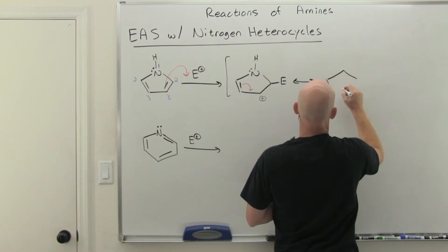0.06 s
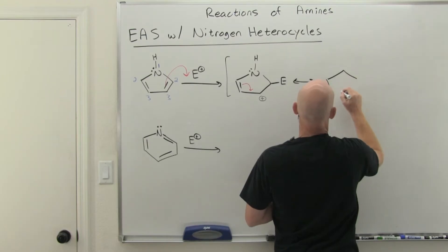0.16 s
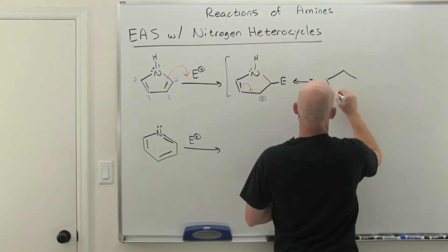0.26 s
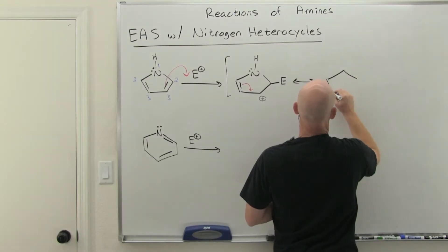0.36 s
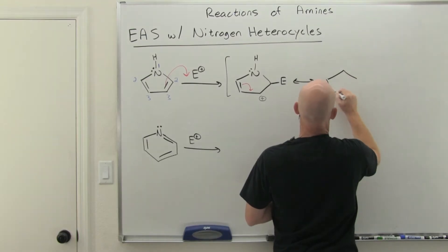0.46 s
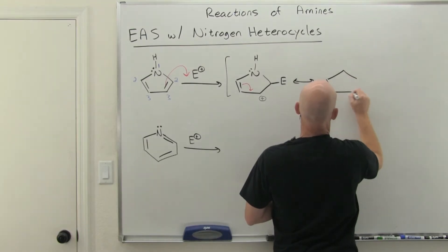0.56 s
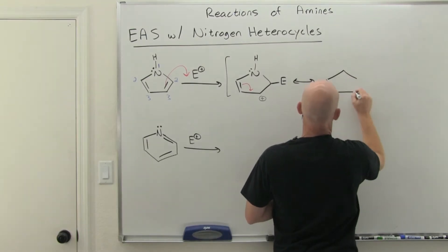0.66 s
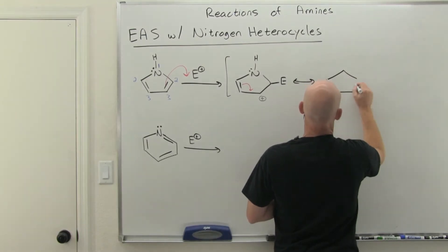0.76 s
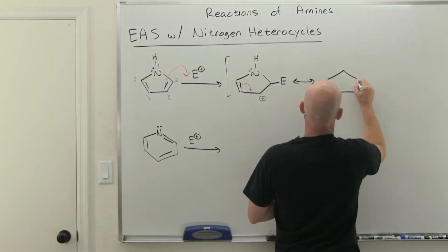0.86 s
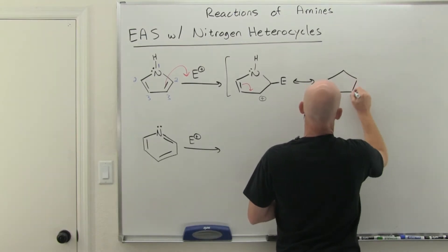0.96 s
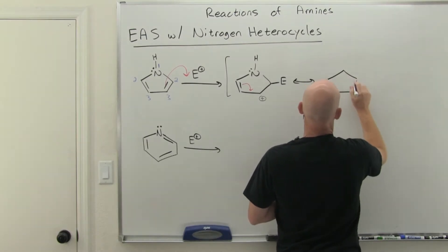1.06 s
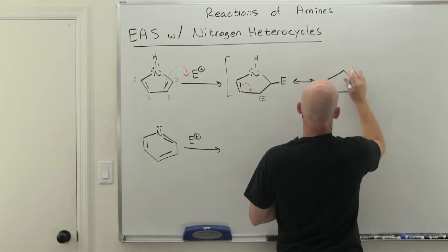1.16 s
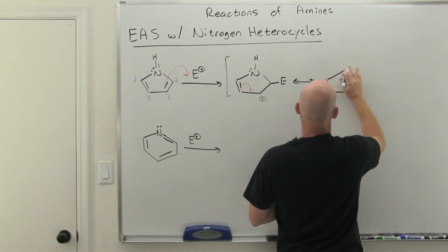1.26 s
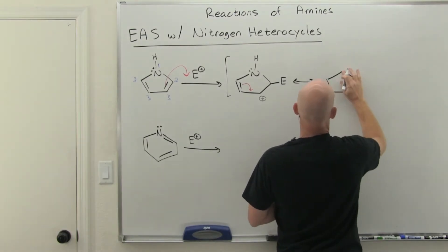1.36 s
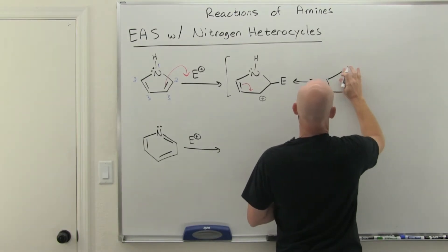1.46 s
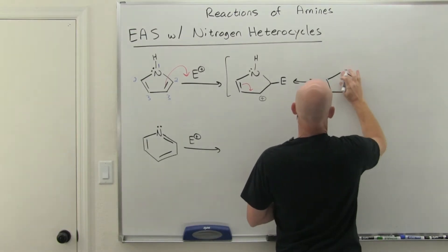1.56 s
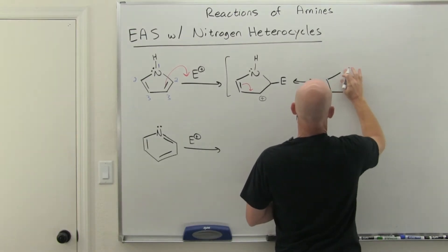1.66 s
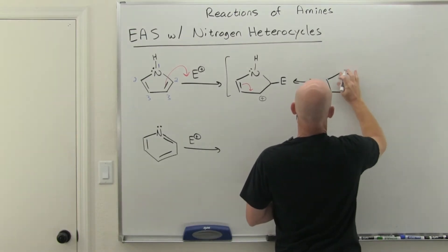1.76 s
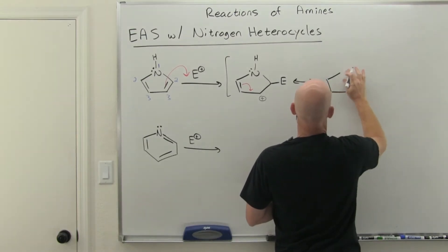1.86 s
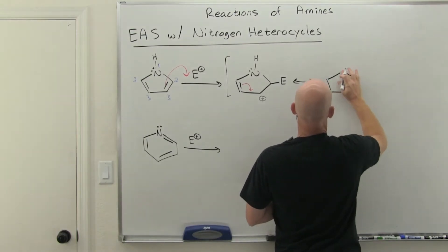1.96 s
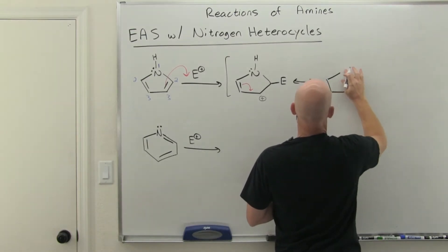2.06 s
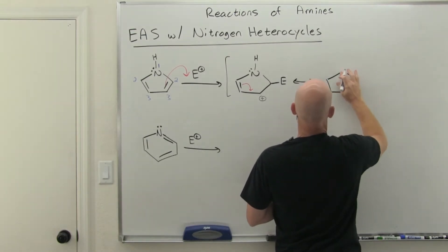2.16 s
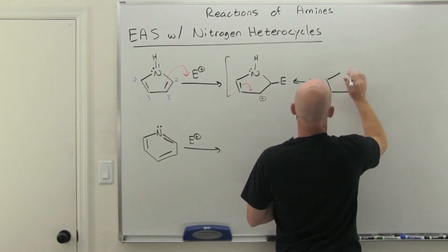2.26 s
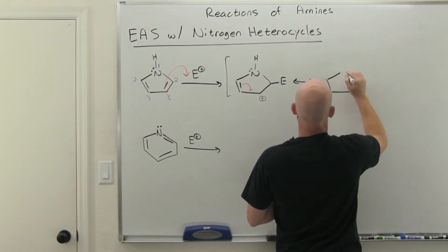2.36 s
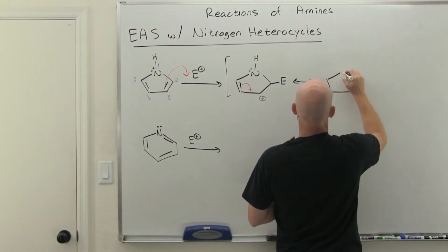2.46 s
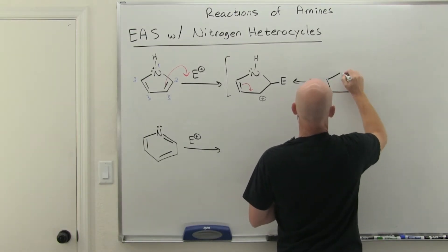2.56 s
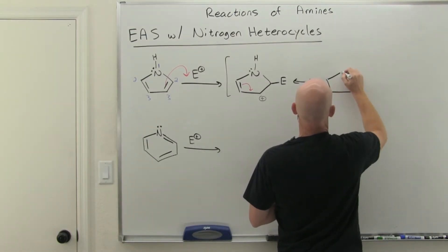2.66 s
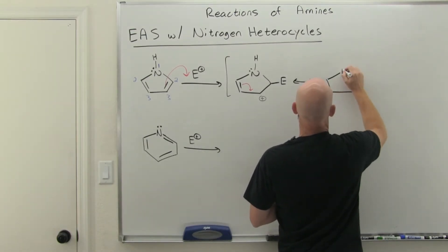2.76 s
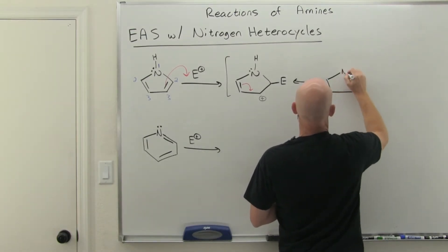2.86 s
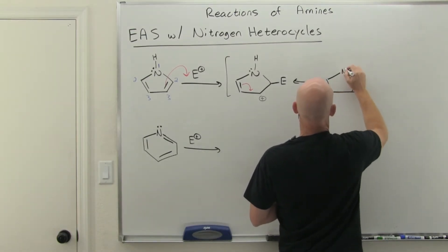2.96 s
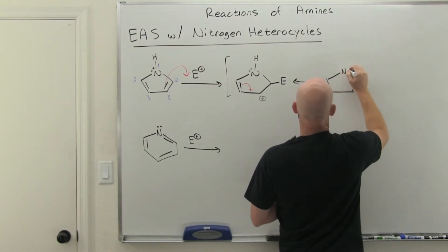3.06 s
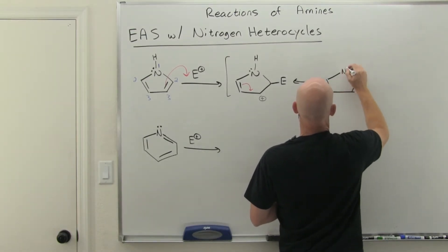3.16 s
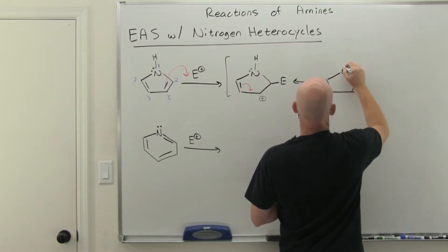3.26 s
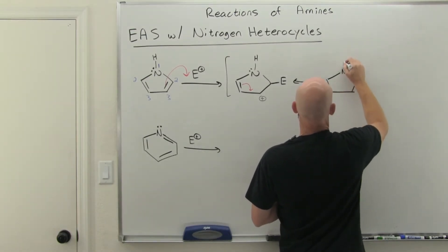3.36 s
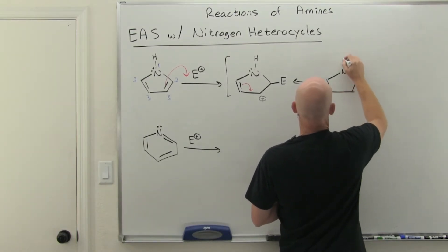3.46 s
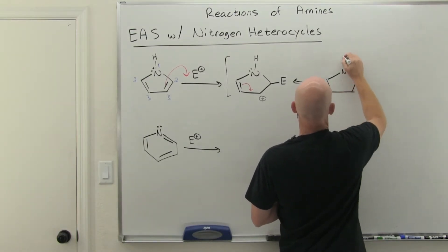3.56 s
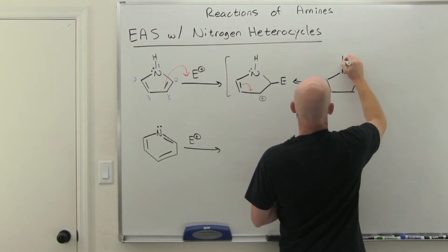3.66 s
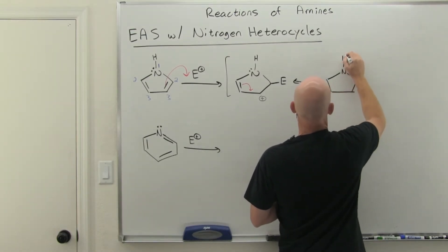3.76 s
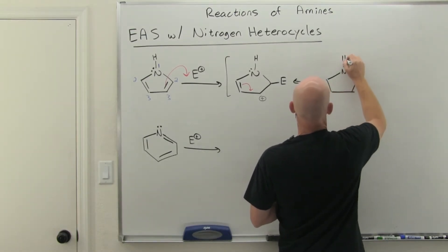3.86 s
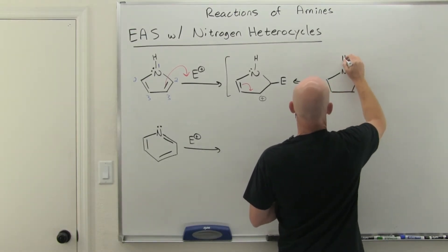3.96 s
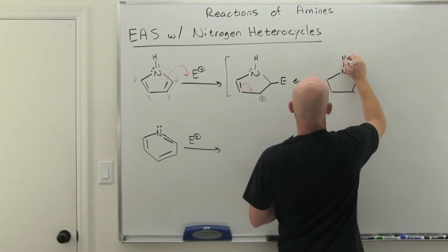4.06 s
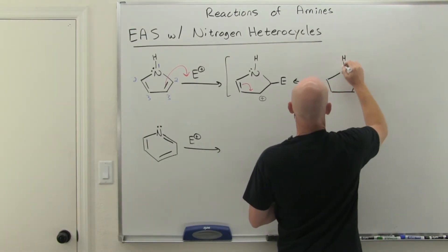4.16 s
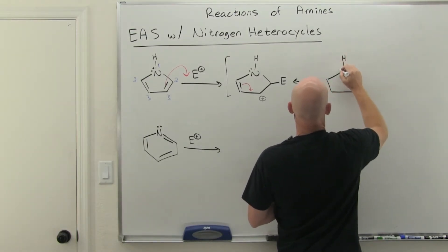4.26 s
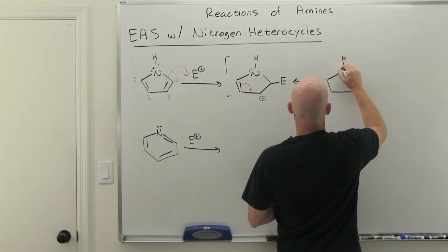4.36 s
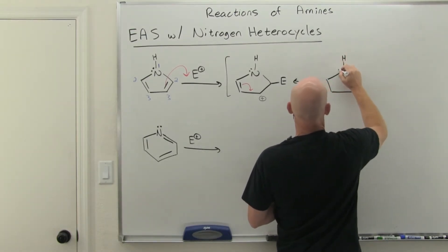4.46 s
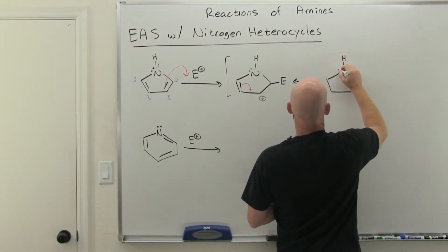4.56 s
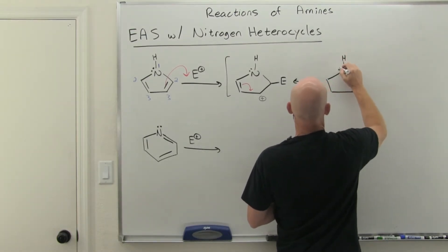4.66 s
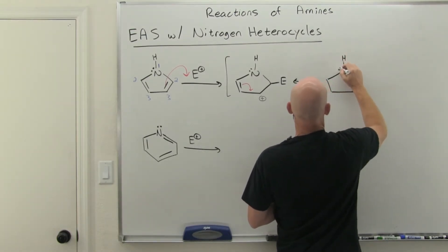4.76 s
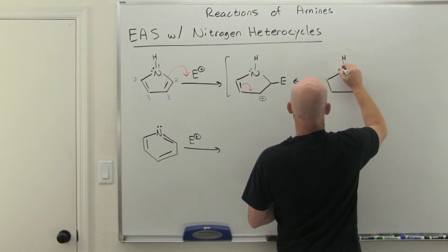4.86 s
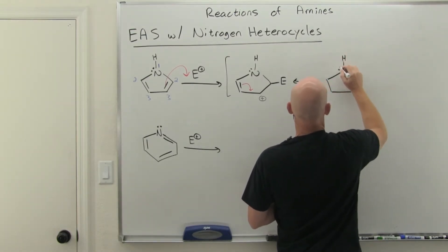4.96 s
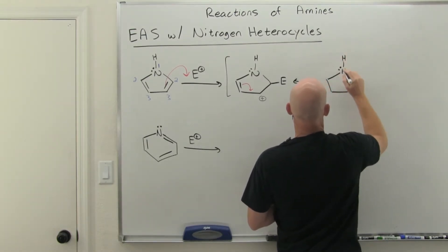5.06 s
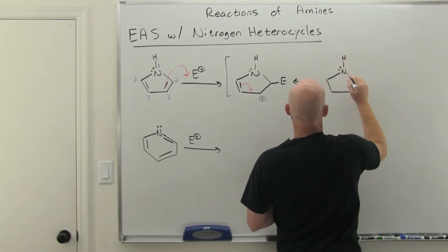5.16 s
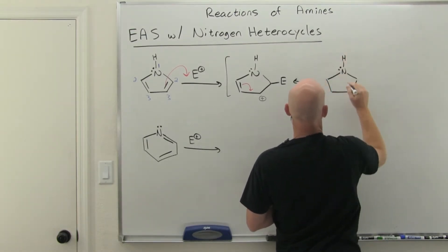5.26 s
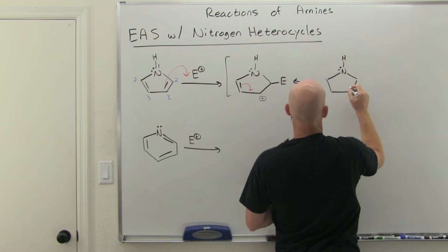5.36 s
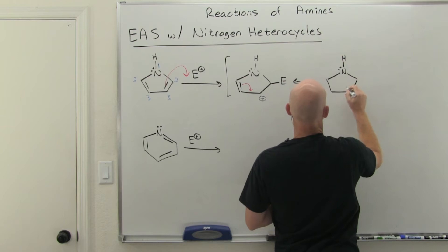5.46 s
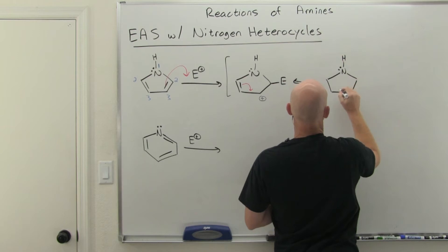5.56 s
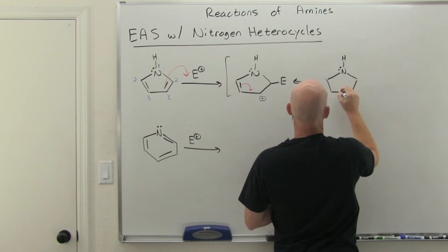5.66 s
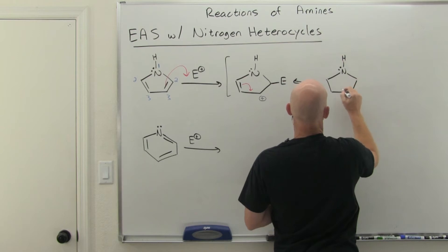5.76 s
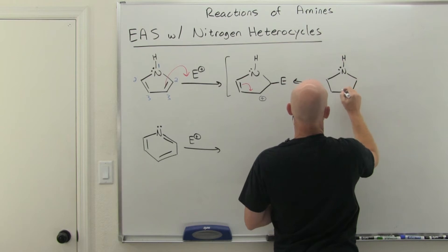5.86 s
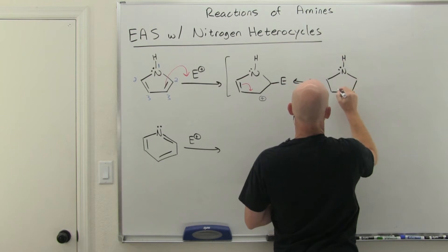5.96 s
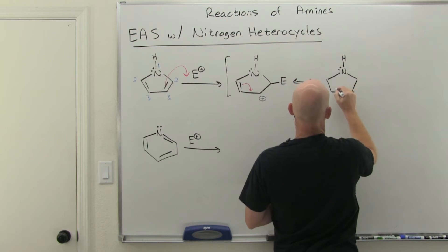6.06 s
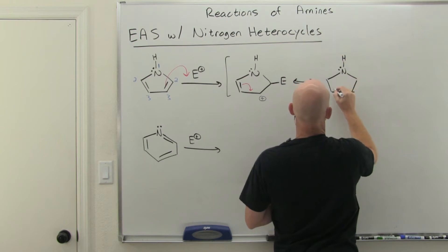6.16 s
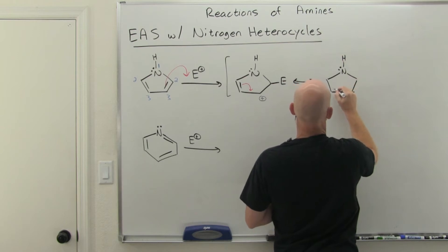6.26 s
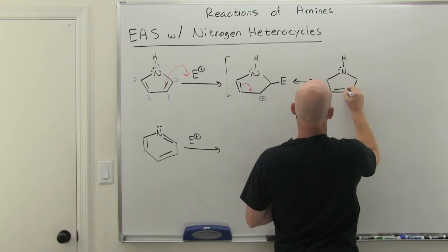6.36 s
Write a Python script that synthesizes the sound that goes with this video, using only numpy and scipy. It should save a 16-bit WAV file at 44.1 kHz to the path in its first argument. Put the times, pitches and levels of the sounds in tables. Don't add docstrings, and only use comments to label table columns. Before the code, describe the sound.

In a small quiet room, a felt marker writes on a wall whiteboard a few steps from the microphone. Soft hollow thumps and dry plastic clicks come sparsely at first, the hardest tap near one second, then cluster in quick succession from the middle onward. Very faint airy squeaks follow some landings. Low ventilation rumble and thin microphone hiss continue throughout.

```python
import sys
import numpy as np
from scipy import signal
from scipy.fft import rfft, irfft, next_fast_len
from scipy.io import wavfile
from scipy.ndimage import uniform_filter1d, map_coordinates

SR = 44100
rng = np.random.default_rng(int(sys.argv[2]) if len(sys.argv) > 2 else 0)


def transcribe(signal):
    frames = np.atleast_2d(signal).T
    limited = np.clip(frames, -1, 1)
    pcm = np.round(limited * 32767).astype(np.int16)
    wavfile.write(sys.argv[1], SR, pcm)


def gain_from_db(level_db):
    decades = np.asarray(level_db, float) / 20
    return 10 ** decades


N = 283122

# start_s, peak_db, low_modes_db, middle_modes_db, contact_ms
TIP_LANDINGS = [
    (0.4468, -23, 3, 8, 0.94),
    (0.9127, -15, -0.5, -8, 0.61),
    (2.604, -20, 3, -1, 0.63),
    (3.321, -18, 1.5, -3, 0.72),
    (3.6144, -23, 2.5, 3, 0.93),
    (3.8591, -20, 0, 4.5, 0.6),
    (4.065, -20, 3.5, 3, 0.81),
    (4.4519, -30.5, 5, -2.5, 1.24),
    (4.76, -28.5, 6, -3, 0.83),
    (6.201, -35.5, 9, 12, 2.2),
]
# pitch_hz, level_db, t60_s
PANEL_MODES = [(44, -11.5, 0.48), (121.5, -10.5, 0.11), (173.4, -18.5, 0.42), (236, 0.5, 0.19),
               (274.8, -10.5, 0.2), (355.2, -5.5, 0.15), (452, -3, 0.098), (520, -6, 0.083),
               (574.4, -10, 0.13), (648, -12, 0.043), (697.7, -3, 0.11), (715, -2.5, 0.13),
               (818, -16, 0.24), (917, -17.5, 0.16)]
# pitch_hz, level_db_per_hz
DENSE_MODES = [(60, -19), (150, -9.5), (300, -5), (700, -8), (900, -15), (1500, -22), (3000, -49),
               (6000, -70)]
# pitch_hz, level_db_per_hz
FELT_SLAP = [(700, -29), (1200, 8.5), (2000, 2), (3000, -7.5), (5000, -19), (9000, -24)]


def taps():
    out, t = np.zeros(N + SR), np.arange(SR // 2) / SR
    for start_s, peak_db, low_db, mid_db, contact_ms in TIP_LANDINGS:
        ring = 0
        for hz, level_db, t60_s in PANEL_MODES:
            place_db = np.interp(hz, [287, 444, 610, 670], [low_db, mid_db, mid_db, 0])
            chance_db, detune = rng.normal(0, [1.5, .006])
            decay = gain_from_db(level_db + place_db + chance_db - 60 * t / t60_s)
            ring = ring + decay * np.cos(2 * np.pi * hz * (1 + detune) * t + 0.2)
        boom_swell = 1 - np.exp(-t / 0.0011)
        ring = ring + gain_from_db(-4.0 - 60 * t / 0.22) * boom_swell * noise(DENSE_MODES, len(t))

        u = (t[:250] - .002) / (contact_ms * 0.00067)
        push = np.exp(-u ** 2 * 2.4)
        body = np.convolve(ring, push / push.sum())[:len(t)]
        jerk = np.exp(-(u + 0.62) ** 2 * 2.6) - gain_from_db(0.5) * np.exp(-(u - .85) ** 2 * 1.2)
        face = np.pad(jerk, (0, len(t) - len(push)))
        slap_rise = np.clip(t / 0.00064 - 1.5, 0, 1)
        slap = gain_from_db(-35.5 - 60 * t / 0.16) * slap_rise * noise(FELT_SLAP, len(t))
        tap = gain_from_db(-9.0) * body + gain_from_db(-4.0 + 0.5 * low_db) * face + slap
        out[round((start_s + .0024) * SR):][:len(t)] += gain_from_db(peak_db) * tap
    return filtered(out[:N], lambda hz: 1j * hz / (1j * hz + 35))


# pitch_hz, width_hz, level_db
BARREL_MODES = [(704, 810, 3.5), (1305, 190, 3), (1480, 120, 8.5), (2237, 43, -3), (4110, 134, 8.5),
                (4120, 117, 4), (5200, 500, -6), (7030, 214, -8.5)]
# delay_ms, level_db
CLICK_BOUNCES = [(0, 7), (.45, 9), (1.3, 5), (1.9, 0.5), (2.6, 3), (3.4, 6), (4.2, -43), (5.0, 5),
                 (6.1, -55), (7.3, 3.5), (9.0, -4), (10.4, -9.5), (12.2, -35)]
# start_s, peak_db
HARD_KNOCKS = [(-0.018, -36.5), (0.9331, -32.5), (1.089, -32), (1.2681, -32), (1.8705, -33.5),
               (2.2788, -32.5), (2.4635, -33.5), (3.443, -34), (3.6318, -31), (3.7722, -34), (3.988, -38),
               (4.0316, -47), (4.1773, -36.5), (4.353, -34.5), (4.9084, -36.5)]
# start_s, peak_db, rattle_db
LIGHT_TICKS = [(0.5254, -49.5, -10), (0.9678, -47, -7), (1.1903, -51, -7.5), (1.365, -50.5, -8),
               (1.9706, -51, -9), (2.383, -56, -11), (2.6734, -49.5, -12), (3.35, -48.5, -8.5),
               (3.6794, -47, -12), (3.8811, -48, -5.5), (4.0873, -49, -4.5), (4.2764, -52.5, -12),
               (4.7932, -47, -11)]
KNOCK_RATTLE_DB, RATTLE_MS = -32.5, 1.6
THIN_HZ_PER_DB = 110


def barrel(hz):
    return sum((-1) ** k * gain_from_db(level_db) * resonance(hz, centre_hz, width_hz)
               for k, (centre_hz, width_hz, level_db) in enumerate(BARREL_MODES))


def crack(hz):
    return resonance(hz, 3890, 3450) ** 2 - gain_from_db(1.0) * resonance(hz, 1750, 3800) ** 2


def clicks():
    out, t = np.zeros(N + SR), np.arange(SR // 4) / SR
    lead_s = 0.1
    scatter = rng.standard_normal(len(t)) * gain_from_db(-20 - 60 * t / 0.13) * (1 - np.exp(-t / 0.00067))
    for start_s, peak_db, rattle_db in [(*row, KNOCK_RATTLE_DB) for row in HARD_KNOCKS] + LIGHT_TICKS:
        chance = rng.standard_normal((3, len(t)))
        knocks = scatter + gain_from_db(-20.5 - 60 * t / 0.24) * chance[0]
        for k, (delay_ms, level_db) in enumerate(CLICK_BOUNCES):
            at_ms = abs(delay_ms + .03 * chance[2, 50 + k])
            knocks[round(at_ms * 1e-3 * SR)] += gain_from_db(level_db + chance[2, k])
        thin_hz = max(50, THIN_HZ_PER_DB * (rattle_db - KNOCK_RATTLE_DB))
        ring = filtered(knocks, lambda hz: (crack(hz) + barrel(hz)) * (1j * hz / (1j * hz + thin_hz)) ** 2)

        rattle = chance[1] * (np.exp(-(t / (RATTLE_MS / 1000)) ** 2) + gain_from_db(-3 - 60 * t / 0.11))
        edge = filtered(rattle, lambda hz: resonance(hz, 5900, 14000) ** 2)
        click = gain_from_db(-11.0) * ring / ring[:400].std() + gain_from_db(rattle_db + 0.5) * edge / edge[:150].std()
        out[round((start_s + lead_s + .0002) * SR):][:len(t)] += gain_from_db(peak_db) * click
    return out[round(lead_s * SR):][:N]


# start_s, length_s, top_db, fastest_place_0_to_1, whistle_hz
PEN_STROKES = [(0.476, 0.22, -61.5, 0.67, 7200), (0.941, 0.11, -63, .15, 5800),
               (2.705, .105, -64, 0.7, 5700), (2.827, 0.12, -67.5, 0.2, 5800),
               (2.901, 0.128, -64, 0.4, 5790), (3.355, 0.08, -65, .3, 5660), (3.64, 0.099, -66, .3, 5750),
               (3.883, 0.08, -64, 0.3, 5680), (4.084, 0.053, -64.5, .15, 5610),
               (4.812, .085, -68, .5, 7060), (6.328, 0.23, -58, 0.75, 6750)]
# pitch_hz, level_db_per_hz
FELT_HISS = [(3000, -34), (5500, -4), (6500, -1), (8000, -1), (9200, -1), (11500, -6.5), (14500, -16),
             (16500, -20)]
# pitch_hz, level_db_per_hz
FELT_SCRUB = [(800, -21), (1800, -2), (3500, 8), (5500, 6), (7500, -31), (10000, -30)]
# start_s, length_s, level_db, pitch_hz, width_hz
FAINT_RUB = (5.24, .17, -70.5, 2400, 150)
SPEED_SHAPE, SAG_HZ_PER_S = 0.53, 1140
WHISTLE_DB, OVERTONE_HZ, OVERTONE_DB = -5, 9050, -12.5
SCRUB_DB, SCRUB_DB_PER_KHZ = -1, -4
HISS_BELOW_HZ, PATCHY_DB = 1900, 1.5


def strokes():
    out, n = np.zeros(N + SR), SR // 4
    t = np.arange(n) / SR
    for start_s, length_s, top_db, fastest, whistle_hz in PEN_STROKES:
        progress = np.interp(t / length_s, [0, np.clip(fastest, .05, .95), 1], [0, 1, 0])
        speed = np.sin(np.pi / 2 * progress) ** SPEED_SHAPE
        sagging_hz = whistle_hz - SAG_HZ_PER_S * (t - length_s / 2)
        tones = gain_from_db(WHISTLE_DB) * whistle(sagging_hz, 300)
        tones = tones + gain_from_db(OVERTONE_DB) * whistle(np.full(n, OVERTONE_HZ), 350)
        scrub_db = SCRUB_DB + SCRUB_DB_PER_KHZ * (whistle_hz - 5700) / 1000
        scrub = gain_from_db(scrub_db) * noise(FELT_SCRUB, n)
        hiss_from_hz = whistle_hz - HISS_BELOW_HZ
        hiss = filtered(noise(FELT_HISS, n), lambda hz: 1 / (1 + (hiss_from_hz / (hz + 1)) ** 12))
        grain = gain_from_db(.8 * wobble(410, n) + 1.3 * wobble(42, n))
        felt = patchy(hiss + tones + scrub, PATCHY_DB)
        out[round(start_s * SR):][:n] += gain_from_db(top_db) * speed * grain * felt

    start_s, length_s, level_db, rub_hz, width_hz = FAINT_RUB
    n = round(length_s * SR)
    out[round(start_s * SR):][:n] += gain_from_db(level_db) * np.hanning(n) * whistle(np.full(n, rub_hz), width_hz)
    return out[:N]


def whistle(hz, width_hz):
    band = unit(filtered(rng.standard_normal(len(hz)), lambda f: 1 / (1 + 1j * f / width_hz) ** 2))
    return np.sqrt(2) * band * np.sin(2 * np.pi * np.cumsum(hz) / SR)


def patchy(x, depth_db):
    z = signal.stft(x, nperseg=256)[2]
    field = uniform_filter1d(rng.standard_normal(z.shape), size=3, axis=0)
    field = uniform_filter1d(field, size=14, axis=1)
    return unit(signal.istft(z * gain_from_db(depth_db * unit(field)), nperseg=256)[1][:len(x)])


# pitch_hz, t60_s
ROOM_DECAY = [(100, 0.57), (500, 0.31), (2000, 0.5), (4000, 0.41), (6000, 0.177), (12000, 0.48)]


def room(x):
    out, hop = np.zeros(N + 2 * SR), round(.15 * SR)
    for start in range(0, N, hop):
        hz, t, z = signal.stft(rng.standard_normal(SR // 3), SR, nperseg=256)
        decay = gain_from_db(-60 * t / along(ROOM_DECAY, hz)[:, None])
        tail = signal.istft(z * decay, SR, nperseg=256)[1]
        wet = signal.fftconvolve(x[start:start + hop], tail / np.linalg.norm(tail))
        out[start + 200:][:len(wet)] += wet
    return out[:N]


# pitch_hz, level_db_per_hz
AIR_NOISE = [(12, -42), (20, -8), (123, -1.5), (216, -7), (459, -11.5), (2320, -30), (3160, -33.5),
             (16000, -38.5)]
# pitch_hz, width_hz, level_db
FAN_LINES = [(60.7, 35, -63), (119.3, 6.6, -63.5), (236.4, 75, -66)]
AIR_DB = -53


def air():
    lines = 0
    for centre_hz, width_hz, level_db in FAN_LINES:
        line = filtered(rng.standard_normal(N), lambda hz: resonance(hz, centre_hz, width_hz) ** 2)
        lines = lines + gain_from_db(level_db + 1.37 * wobble(1.4)) * unit(line)
    bed = noise(AIR_NOISE)
    rumble = filtered(bed, lambda hz: 1 / (1 + (hz / 900) ** 2))
    hiss = bed - rumble
    return gain_from_db(AIR_DB) * (hiss + rumble * gain_from_db(1.24 * wobble(6.6))) + lines


def unit(x):
    return x / np.sqrt(np.mean(x ** 2) + 1e-20)


def along(points, hz):
    f, v = np.transpose(points)
    return np.interp(np.log(hz + 1), np.log(f + 1), v)


def filtered(x, response):
    m = next_fast_len(len(x) + 8192)
    return irfft(rfft(x, m) * response(np.fft.rfftfreq(m, 1 / SR)), m)[:len(x)]


def noise(spectrum, n=N):
    return unit(filtered(rng.standard_normal(n), lambda hz: gain_from_db(along(spectrum, hz))))


def resonance(hz, centre_hz, width_hz):
    return 1j * hz * width_hz / (centre_hz ** 2 - hz ** 2 + 1j * hz * width_hz)


def wobble(rate_hz, n=N):
    knots = rng.standard_normal(int(n * rate_hz / SR) + 4)
    return map_coordinates(knots, [np.arange(n) * rate_hz / SR])


def scene():
    thump, click, felt = taps(), clicks(), strokes()
    wet = room(gain_from_db(-12.0) * thump + gain_from_db(-12.0) * click + gain_from_db(-16) * felt)
    return (thump + click + felt + wet + air())[None]


def band_limit(x):
    return signal.sosfilt(signal.butter(12, 16480, fs=SR, output="sos"), x)


def record(dry):
    mix = filtered(dry[0], lambda hz: 1 / (1 + (hz / 15700) ** 120))[None]
    return band_limit(mix)


dry = scene()
out = record(dry)
transcribe(out)
```